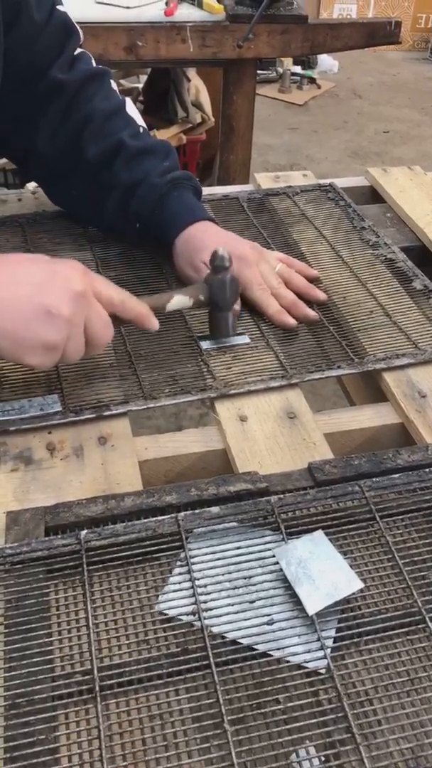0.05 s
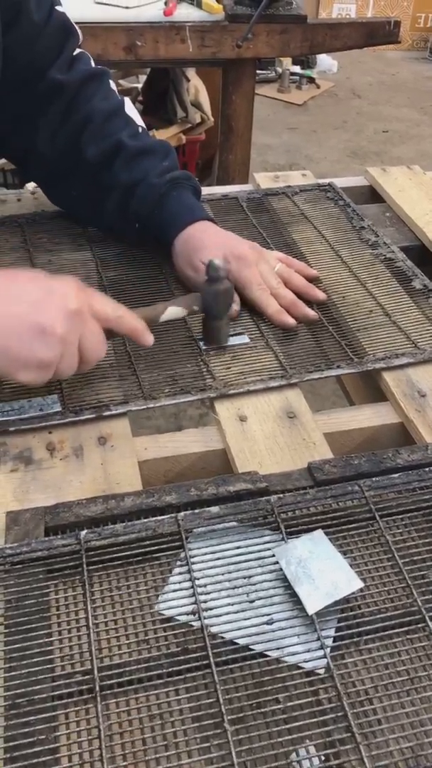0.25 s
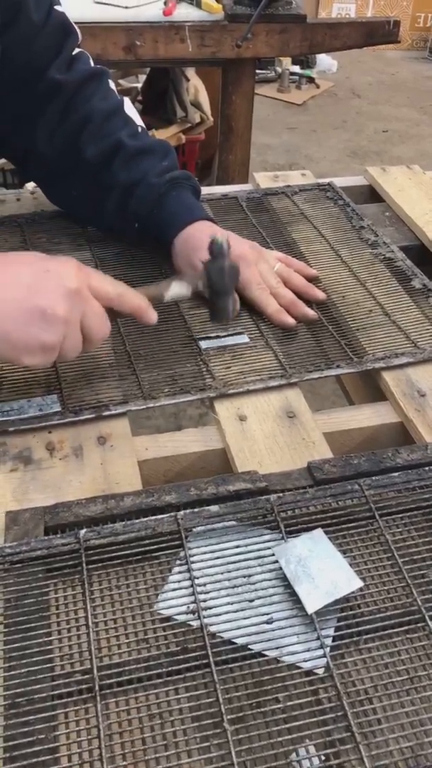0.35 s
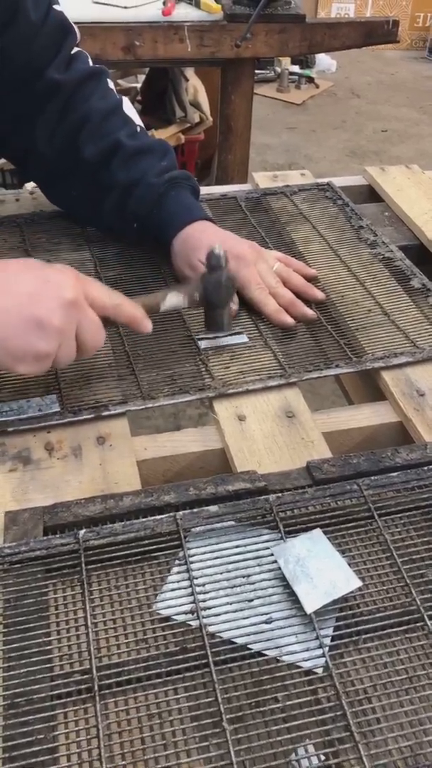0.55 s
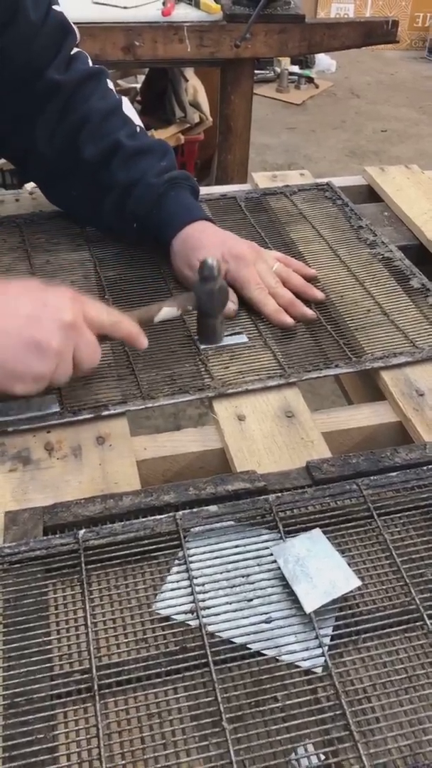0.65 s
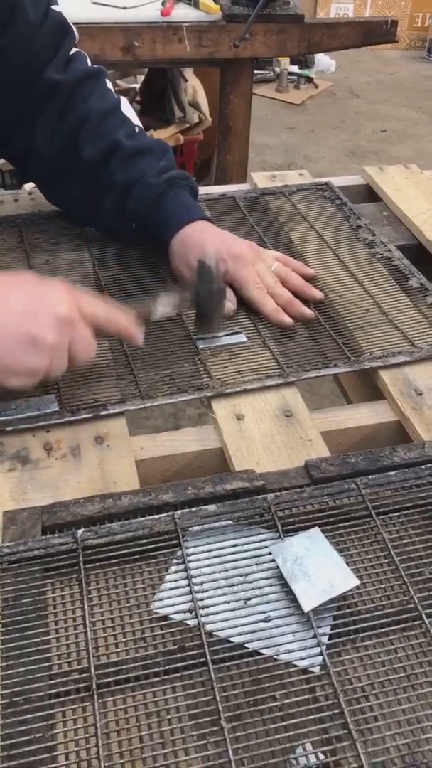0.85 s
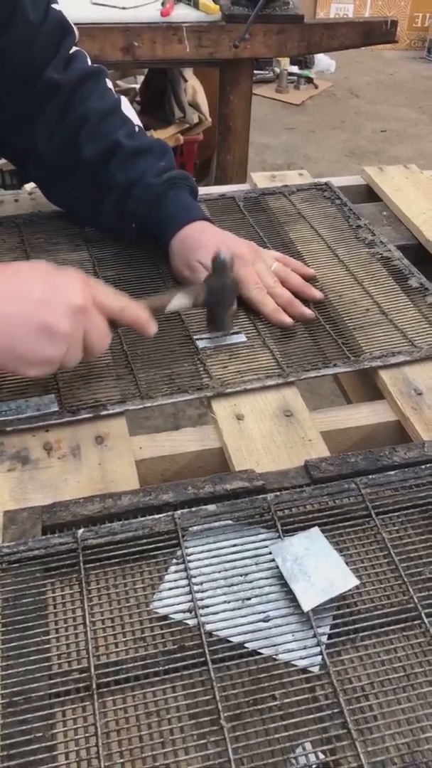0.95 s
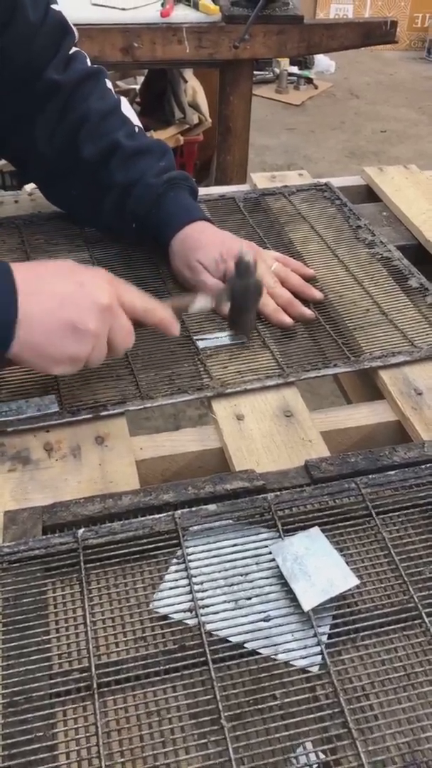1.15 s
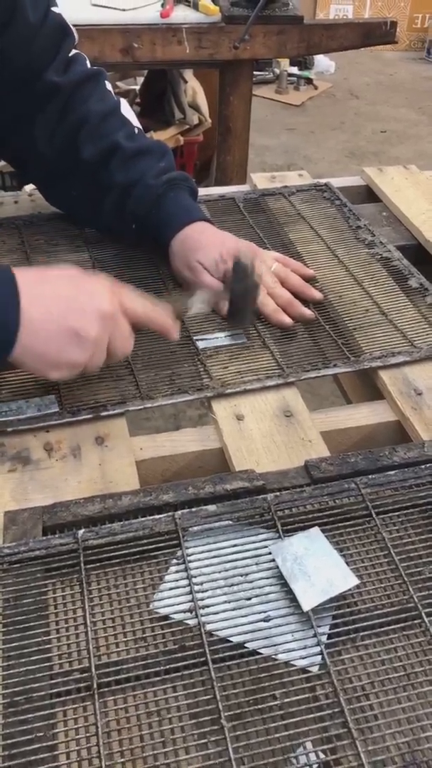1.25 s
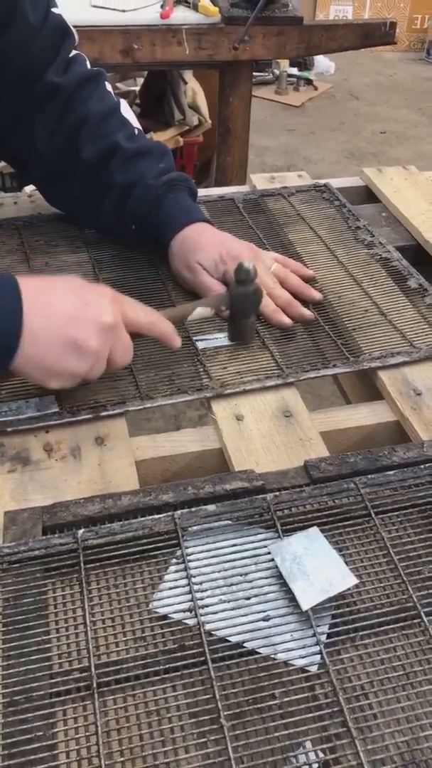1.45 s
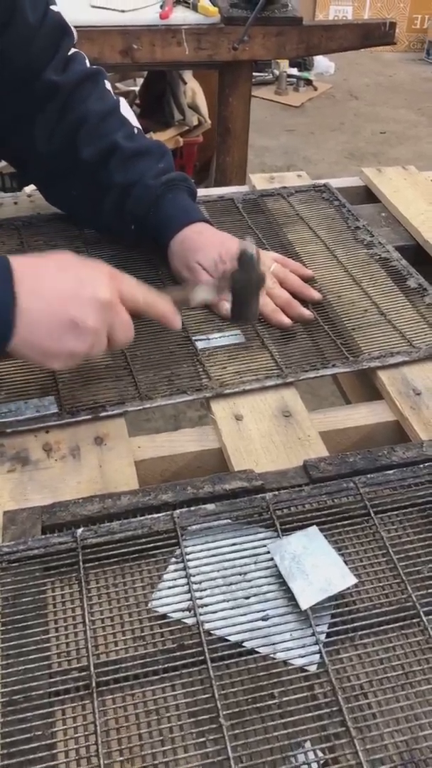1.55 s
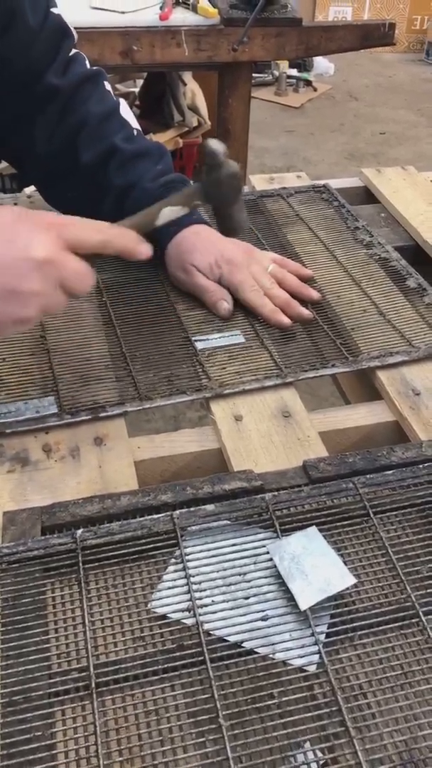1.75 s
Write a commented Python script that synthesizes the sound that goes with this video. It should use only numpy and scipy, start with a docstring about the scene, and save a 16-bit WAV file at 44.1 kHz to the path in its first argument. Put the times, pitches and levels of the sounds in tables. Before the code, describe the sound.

A small hammer taps thin sheet metal lying on a wire grid. After the fading rattle of an earlier blow, seven close taps land at about 0.2, 0.5, 0.7, 0.9, 1.1, 1.3 and 1.5 seconds, quickening slightly. Each is a bright clack with ringing wire rattle, a low wooden thump and a faint high sizzle. The last tap dies away in the light reverberation of a large, quiet workshop.

```python
"""A small hammer taps a strip of thin sheet metal on a wire grid over a wooden pallet, at a quickening pace.
Each impact excites a bright tick, then a clack as the strip is driven onto the grid. The wires rattle
and ring, the pallet thumps in its low modes, and a high sizzle lingers. A large workshop reverberates
behind, and an automatic gain control ducks at loud taps and recovers."""
import sys
import numpy as np
from scipy import signal
from scipy.fft import rfft, irfft
from scipy.io import wavfile
from scipy.ndimage import uniform_filter1d, minimum_filter1d

SR = 44100
rng = np.random.default_rng(int(sys.argv[2]) if len(sys.argv) > 2 else 0)


def transcribe(signal):
    """Save signal, clipped to [-1, 1], as a 16-bit WAV file at the path in sys.argv[1]."""
    frames = np.atleast_2d(signal).T
    limited = np.clip(frames, -1, 1)
    pcm = np.round(limited * 32767).astype(np.int16)
    wavfile.write(sys.argv[1], SR, pcm)


N = 79380
LEAD = SR // 4  # samples of run-in before time zero
AGE = np.arange(N) / SR
IMPACT_RISE_S = .0002


def from_db(db):
    """Amplitude grows tenfold for every 20 dB."""
    return 10 ** (np.asarray(db) / 20)


def at_hz(points, hz):
    """Interpolation along a logarithmic frequency axis."""
    frequencies, values = np.transpose(points)
    return np.interp(np.log(hz), np.log(frequencies), values)


def envelope(rise_s, t60, size):
    """Exponential build-up and damping; the decay time t60 is the time to fall by 60 dB."""
    t = AGE[:size]
    return (1 - np.exp(-t / rise_s)) * from_db(-60 * t / t60)


def ring(hz, t60, rise_s, size):
    """A struck mode vibrates as a damped sinusoid."""
    return np.sin(2 * np.pi * hz * AGE[:size]) * envelope(rise_s, t60, size)


def noise(colour, count, size):
    """Random phases under a given spectrum make rows of coloured noise, rms 1."""
    hz = np.maximum(np.fft.rfftfreq(size, 1 / SR), 1)
    phases = np.exp(2j * np.pi * rng.random((count, len(hz))))
    x = irfft(from_db(at_hz(colour, hz)) * phases, size)
    return x / x.std()


def bands(sources, colour):
    """Third-octave (Hz, band) pairs, fed in turn by two uncorrelated sources so their powers add to 1."""
    edges = 22 * 2 ** (np.arange(30) / 3)
    centres = np.sqrt(edges[1:] * edges[:-1])
    parts = []
    for k, hz in enumerate(centres):
        bandpass = signal.butter(2, edges[k:k + 2], "band", fs=SR, output="sos")
        parts.append(from_db(at_hz(colour, hz)) * signal.sosfilt(bandpass, sources[k % 2]))
    total_rms = np.sqrt(sum(np.mean(part ** 2) for part in parts))
    return [(hz, part / total_rms) for hz, part in zip(centres, parts)]


def lowpass(x, hz):
    """A third-order filter attenuates the treble above its cutoff."""
    return signal.sosfilt(signal.butter(3, hz, fs=SR, output="sos"), x)


# Spectrum of the workshop air. Each row: frequency in Hz, spectral density in dB.
AIR_SPECTRUM = [(25, -32), (80, 15), (160, -15.5), (300, -4.5), (1000, 17.5), (3000, -9), (8000, -18),
                (16000, -32)]
def air():
    """Stationary noise forms the quiet ambient floor."""
    return from_db(-45) * noise(AIR_SPECTRUM, count=1, size=N)[0]


# Colour of the reverberation. Each row: frequency in Hz, band level in dB.
ROOM_BANDS = [(60, -9), (250, -2.5), (500, 0), (1000, -1.5), (2200, -3.5), (4000, -2), (7300, -1),
              (10000, -5.5), (12500, 0), (15000, -1)]
# Reverberation time. Each row: frequency in Hz, decay time in seconds.
ROOM_DECAY = [(80, 0.86), (300, 1.05), (1100, 1.08), (3000, 0.98), (7000, 0.78), (13000, 1.15)]
def workshop(x):
    """Reverberation is convolution with the room's impulse response: a wall echo and a diffuse tail."""
    rise_s, echo_s = .0067, .0375
    tail = sum(band * envelope(rise_s, at_hz(ROOM_DECAY, hz), N)
               for hz, band in bands(rng.standard_normal((2, N)), ROOM_BANDS))
    # Even out narrow peaks: no single pitch booms in so large a room.
    spectrum = rfft(tail, 2 * N)
    power = np.abs(spectrum) ** 2
    wide, narrow = (np.abs(uniform_filter1d(power, bins)) for bins in (700, 70))
    tail = irfft(spectrum * np.sqrt(wide / (narrow + 1e-6)))[:N]
    response = from_db(-12) * tail / np.sqrt(np.sum(tail ** 2))
    response[int(echo_s * SR)] += from_db(-16.5)
    return lowpass(signal.fftconvolve(x, response)[:len(x)], hz=10000)


def add(track, start_s, sound):
    """Superposition: a sound adds to the track from its start time on."""
    i = int(start_s * SR + LEAD)
    track[i:i + len(sound)] += sound[:len(track) - i]


# Spectrum of the sliding strip. Each row: frequency in Hz, spectral density in dB.
SLIDE_SPECTRUM = [(1000, 0), (3000, 5.5), (7500, 4), (10000, -3.5), (13000, -1), (16000, -8)]
def slide():
    """Friction makes a faint hiss as the strip shifts on the wires under the hand."""
    track = np.zeros(LEAD + N)
    hiss = noise(SLIDE_SPECTRUM, count=1, size=N)[0] * envelope(rise_s=.017, t60=1, size=N)
    add(track, start_s=.102, sound=from_db(-33) * hiss)
    return track


# Spectrum of the sizzle after a tap. Each row: frequency in Hz, spectral density in dB.
SIZZLE_SPECTRUM = [(1500, 4), (3200, 0), (5300, -10), (5600, 5), (6000, -1), (7000, -3), (7350, 8),
                   (7800, -7), (9000, -1.5), (10200, -11.5), (12500, -2), (16000, -8)]
def sizzles(count, size):
    """Noise with narrow spectral peaks is heard as a faintly ringing sizzle; it swells, then dies."""
    rise_s, decay_from_s, t60 = .095, .12, .17
    t = AGE[:size]
    swell = 1 - np.exp(-t / rise_s)
    decay = from_db(-60 * np.maximum(t - decay_from_s, 0) / t60)
    return from_db(-33.5) * noise(SIZZLE_SPECTRUM, count, size) * swell * decay


# Modes of the pallet. Each row: frequency in Hz, level in dB, decay time in seconds.
WOOD_MODES = [(70.8, -23.5, 0.17), (109, -15, 0.097), (168.6, -18.5, 0.046)]
# Rumble of the pallet. Each row: frequency in Hz, spectral density in dB.
RUMBLE_SPECTRUM = [(25, -30), (45, -17), (70, 6.5), (110, -2.5), (170, 0.5), (250, 8), (400, -6),
                   (800, -23.5)]
def thumps(count, size):
    """The pallet's impulse response is a few damped low modes and a dull rumble."""
    knock = sum(from_db(db) * ring(hz, t60, IMPACT_RISE_S, size) for hz, db, t60 in WOOD_MODES)
    rumble = noise(RUMBLE_SPECTRUM, count, size) * envelope(rise_s=.0013, t60=.23, size=size)
    return knock + from_db(-13.5) * rumble


# Modes of the wire grid. Each row: frequency in Hz, level in dB, decay time in seconds.
WIRE_MODES = [(206.5, -1.5, 0.14), (290.3, -2, 0.15), (353, -7, 0.21), (530, 0, 0.036), (812, -4.5, 0.061),
              (1086, 4, 0.24), (1270, -27, .1), (1400, 5, 0.088), (1455, 4.5, 0.085), (2040, -19, .06),
              (2177, 10, 0.026), (2380, -12, 0.043), (2890, -34, 0.023)]
def grid(size):
    """Modal vibration: each blow loads the grid at another spot, varying the modes' shares and pitches."""
    level_db, scatter_db, pitch_scatter = -15, 2.5, .03
    ringing = np.zeros(size)
    for k, (hz, db, t60) in enumerate(WIRE_MODES):
        gain = from_db(level_db + db + rng.normal(0, scatter_db))
        detuned_hz = hz * rng.normal(1, pitch_scatter)
        ringing += (-1) ** k * gain * ring(detuned_hz, t60, rise_s=.004, size=size)
    return ringing


# Colour of the wire rattle. Each row: frequency in Hz, band level in dB.
RATTLE_BANDS = [(200, -4), (420, -6), (700, -3), (1100, 4.5), (1600, -1), (2300, 1), (3200, -4.5),
                (5000, -13.5), (8500, -16.5), (10500, -23.5), (12500, -24), (15000, -50)]
# Damping of the rattle. Each row: frequency in Hz, decay time in seconds.
RATTLE_DECAY = [(200, 0.31), (1000, 0.17), (2200, 0.098), (5000, 0.12), (14000, 0.13)]
def rattles(count, size):
    """Wire collisions form a dense random impulse train; the lows build later and last longer."""
    clicks_per_s, scatter_db = 5000, 3
    shape = (2, count, size)
    collisions = rng.random(shape) < clicks_per_s / SR
    clicks = collisions * rng.choice([-1, 1], shape) * from_db(rng.normal(0, scatter_db, shape))
    chatter = np.zeros((count, size))
    for hz, band in bands(clicks, RATTLE_BANDS):
        rise_s = .0041 * np.sqrt(1000 / max(hz, 1000))
        chatter += band * envelope(rise_s, at_hz(RATTLE_DECAY, hz), size)
    return from_db(-1.5) * lowpass(chatter, hz=12500)


# Spectrum of the strip hitting a wire. Each row: frequency in Hz, spectral density in dB.
CLACK_SPECTRUM = [(300, 2), (2200, 9.5), (4000, 7), (6000, 2), (9000, -14.5), (10500, -23), (12800, 4),
                  (15000, -28)]
def clacks(count, size):
    """A brief contact has a broad spectrum: the strip snaps against a wire."""
    return noise(CLACK_SPECTRUM, count, size) * envelope(IMPACT_RISE_S, t60=.0099, size=size)


# Spectrum of the hammer's impact. Each row: frequency in Hz, spectral density in dB.
CRACK_SPECTRUM = [(500, 0.5), (2000, 5), (3300, 0.5), (4700, 0), (7300, -2), (9000, -12.5), (10500, -7),
                  (12800, 1.5), (16000, -20)]
# Brief ring of the impact. Each row: frequency in Hz, level in dB, decay time in seconds.
IMPACT_MODES = [(5500, -16, 0.0064), (8560, -17.5, 0.021), (9050, -14, 0.017), (12650, -11, .012),
                (14400, -28, 0.0075)]
# Thin ring of the hammer head. Each row: frequency in Hz, level in dB, decay time in seconds.
HAMMER_MODES = [(13954, -47, .45), (14643, -45, .45)]
def ticks(count, size):
    """A hard impact of steel on the strip radiates a bright crack and excites high modes."""
    crack = noise(CRACK_SPECTRUM, count, size) * envelope(IMPACT_RISE_S, t60=.008, size=size)
    ringing = sum(from_db(db) * ring(hz, t60, IMPACT_RISE_S, size)
                  for hz, db, t60 in IMPACT_MODES + HAMMER_MODES)
    return from_db(2) * crack + ringing


# The strip drops back on the wires. Each row: start in seconds, level in dB.
STRIP_REBOUNDS = [(0.2753, -20), (.5135, -34), (1.1375, -13), (1.507, -6)]
# Hammer blows. Each row: start in seconds, tick gain in dB, delay until the strip meets the grid in
# seconds, rattle, grid and thump gains in dB, strip pitch in Hz, strip and sizzle gains in dB.
HAMMER_BLOWS = [(-.09, 2, .003, -5, -6, 1, 2000, -37.5, -6),
                (0.2344, -0.5, .0047, -9.5, -9.5, -3, 2210, -9, 5),
                (.4745, 0, .0042, -6, -9, -5, 2280, 4, 3.5),
                (.6885, -1.5, .0030, -4.5, -8.5, -2.5, 1768, 1.5, 5.5),
                (.8980, 2, .0018, 0, -8.5, -4, 1940, 5, -7),
                (1.1086, 2.5, .0035, -2.5, -4.5, -2, 2135, -0.5, -1),
                (1.2975, -3.5, .0015, 0, 2.5, -2, 2460, -8, -6),
                (1.4832, -10.5, 0.00047, 3.5, -5, -2, 1950, 3, 1)]
def hammering():
    """Each impulse passes from hammer to strip, grid and pallet; the strip sometimes rebounds."""
    thump_lag_s, clack_db, strip_base_db = .0015, -7, -5.5
    track = np.zeros(LEAD + N)
    count, size = len(HAMMER_BLOWS), SR // 2
    parts = [source(count, size) for source in (ticks, clacks, rattles, thumps, sizzles)]
    for blow, tick, clack, rattle, thump, sizzle in zip(HAMMER_BLOWS, *parts):
        start_s, tick_db, delay_s, rattle_db, grid_db, thump_db, strip_hz, strip_db, sizzle_db = blow
        strip = from_db(strip_base_db + strip_db) * ring(strip_hz, t60=.021, rise_s=.0004, size=size)
        wires = from_db(rattle_db) * rattle + from_db(grid_db) * grid(size)
        add(track, start_s, from_db(tick_db) * tick + from_db(sizzle_db) * sizzle)
        add(track, start_s + thump_lag_s, from_db(thump_db) * thump)
        add(track, start_s + delay_s, from_db(clack_db) * clack + strip + wires)
    for (start_s, db), clack in zip(STRIP_REBOUNDS, clacks(len(STRIP_REBOUNDS), size)):
        add(track, start_s, from_db(db) * clack)
    return track


def scene():
    """Direct sound and reverberation superpose with the slide and the workshop air."""
    taps = hammering()
    return (taps + workshop(taps) + slide())[LEAD:] + air()


def record(dry):
    """Dynamic range compression: gain ducks and recovers, a limiter holds peaks, band edges are cut."""
    threshold_db, duck_share, attack_s, recover_db_per_s = -7.5, .52, .009, 38
    low_cut_hz, high_cut_hz, limiter_hold_s = 49, 15750, .003
    dry = signal.sosfilt(signal.butter(2, low_cut_hz, "high", fs=SR, output="sos"), dry)
    level_db = 10 * np.log10(np.maximum(uniform_filter1d(dry ** 2, size=128), 1e-12))
    reduction_db = duck_share * np.maximum(level_db - threshold_db, 0)
    recovery_db = recover_db_per_s * AGE
    duck_db = np.maximum.accumulate(reduction_db + recovery_db) - recovery_db
    pole = np.exp(-1 / (attack_s * SR))
    ducked = dry * from_db(-signal.lfilter([1 - pole], [1, -pole], duck_db))
    hold = int(limiter_hold_s * SR)
    safe_gain = 1 / np.maximum(np.abs(ducked), 1)
    limited = ducked * uniform_filter1d(minimum_filter1d(safe_gain, hold), hold)
    return signal.sosfilt(signal.ellip(10, .1, 80, high_cut_hz, fs=SR, output="sos"), limited)


dry = scene()
out = record(dry)
transcribe(out)
```